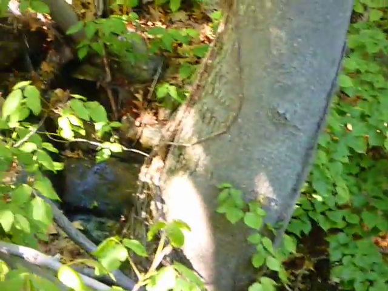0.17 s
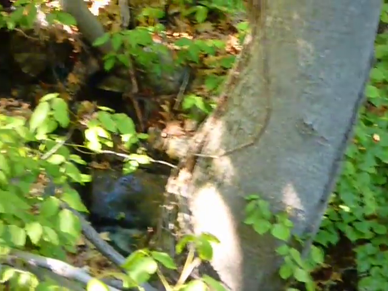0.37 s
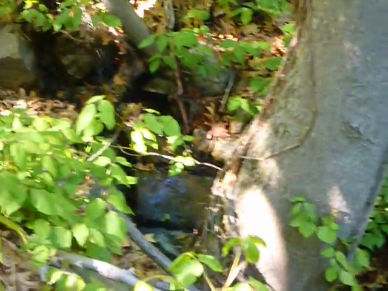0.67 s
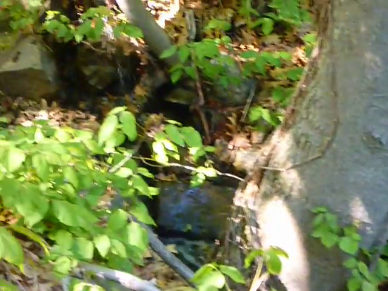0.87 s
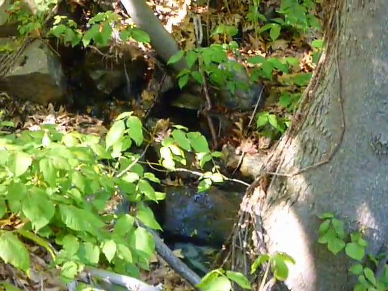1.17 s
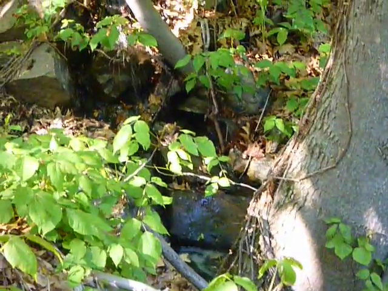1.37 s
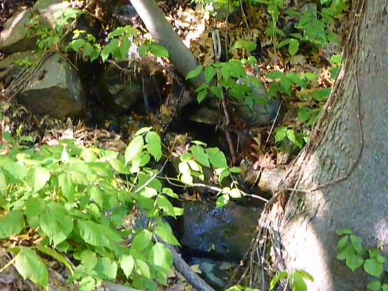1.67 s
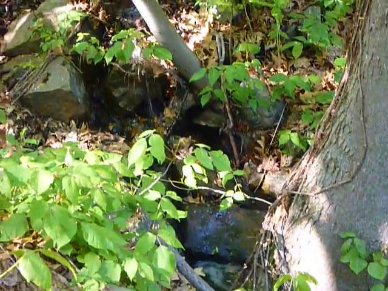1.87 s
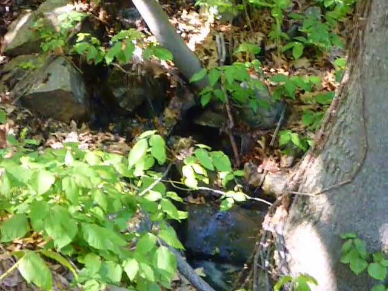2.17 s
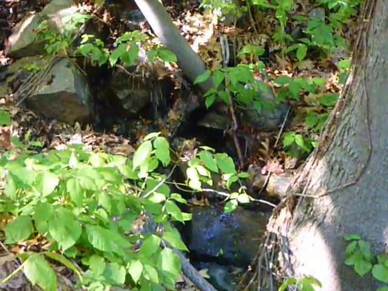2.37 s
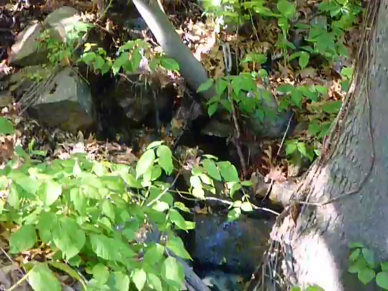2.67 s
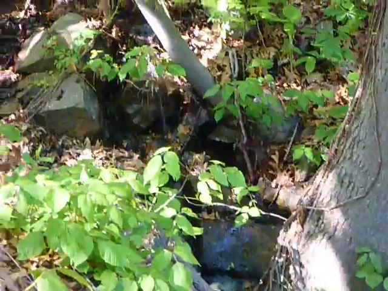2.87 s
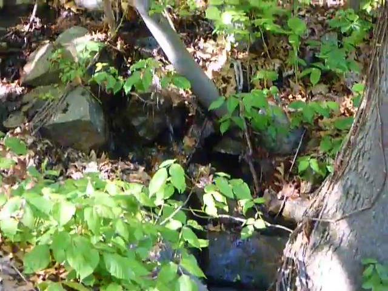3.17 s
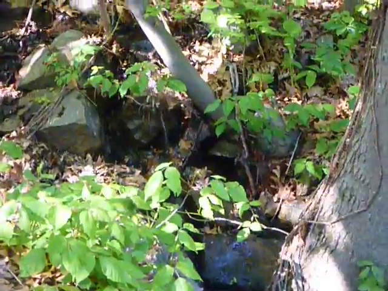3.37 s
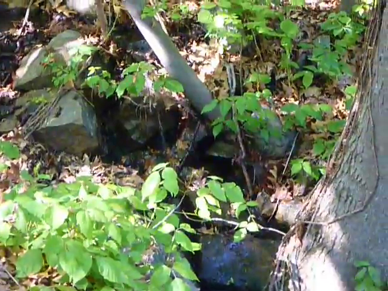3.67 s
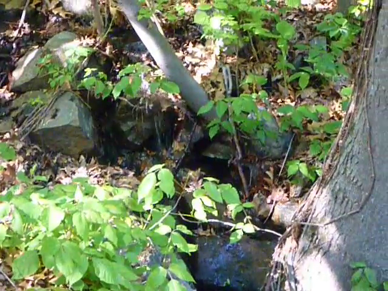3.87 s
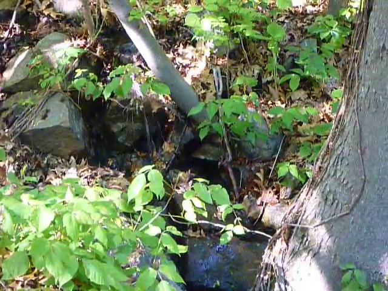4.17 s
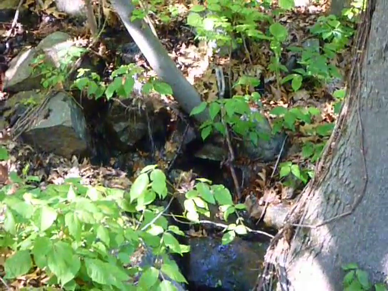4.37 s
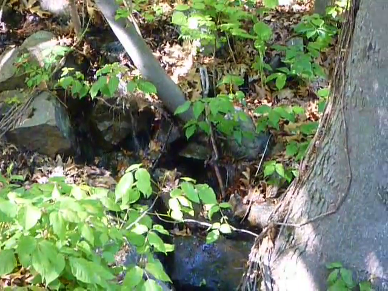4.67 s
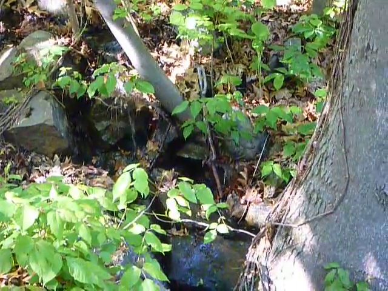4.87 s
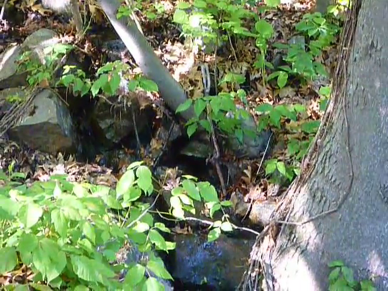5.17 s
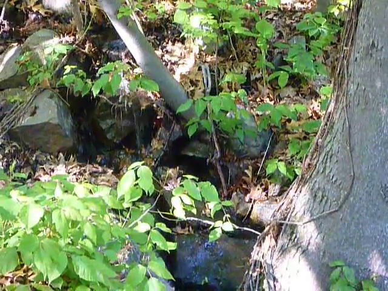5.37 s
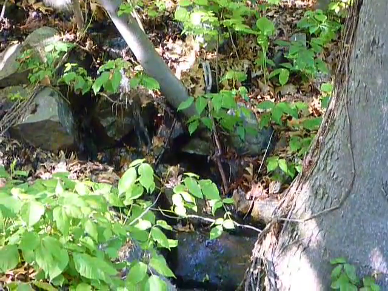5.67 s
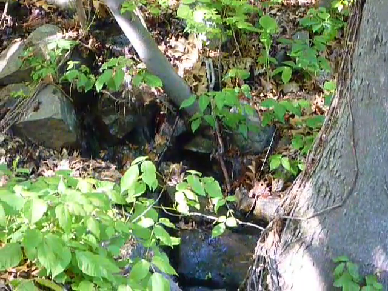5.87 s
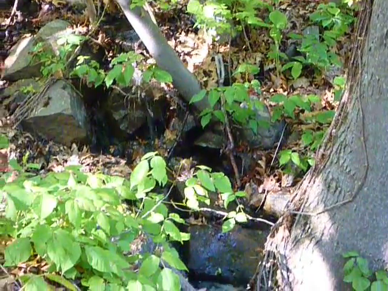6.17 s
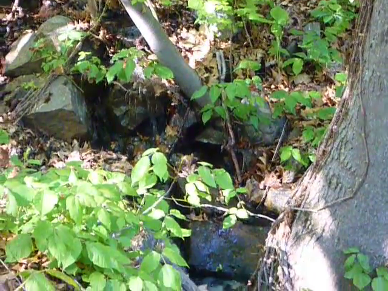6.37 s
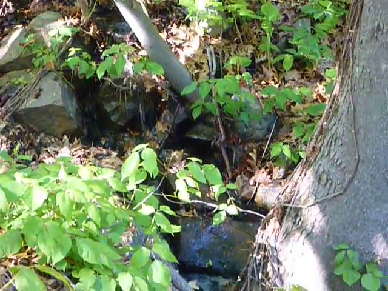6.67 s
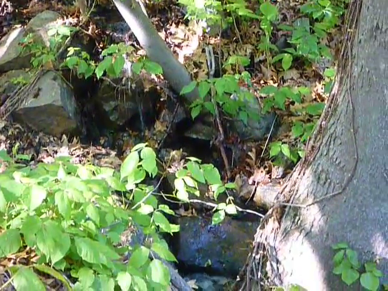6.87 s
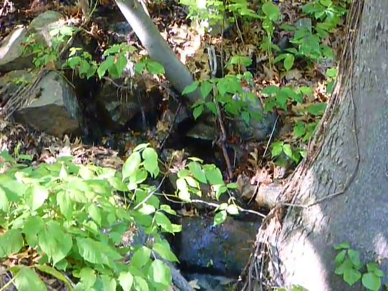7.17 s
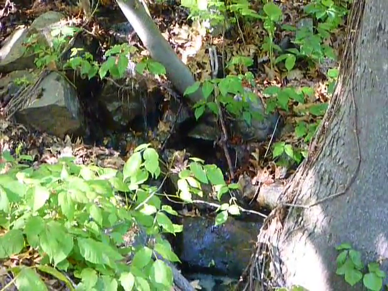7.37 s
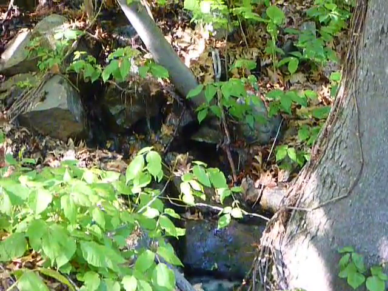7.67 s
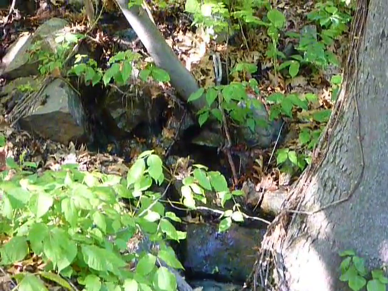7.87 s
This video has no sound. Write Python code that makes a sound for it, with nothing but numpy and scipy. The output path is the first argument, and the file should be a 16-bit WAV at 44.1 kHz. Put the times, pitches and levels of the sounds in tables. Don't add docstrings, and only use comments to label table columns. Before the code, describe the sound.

Constant babbling stream water, nearly level throughout, dipping very slightly near six seconds and a touch stronger at the end. Watery plops and bloops ring over the rush, clustered around one to three seconds and again in the last two, with quick slaps against rock and thin spray ticks. Short, close outdoor reflections, soft low rumble, mono sound with muffled top end.

```python
import sys
import numpy as np
from scipy import signal
from scipy.fft import rfft, irfft, next_fast_len
from scipy.io import wavfile
from scipy.ndimage import uniform_filter1d, map_coordinates

SR = 44100
rng = np.random.default_rng(int(sys.argv[2]) if len(sys.argv) > 2 else 0)


def how_loud(loudness_db):
    steps = np.asarray(loudness_db, float) / 20
    return 10 ** steps


def generate_wav(sig):
    pcm = np.round(np.clip(np.atleast_2d(sig).T, -1, 1) * 32767).astype(np.int16)
    wavfile.write(sys.argv[1], SR, pcm)


N = 354167


def unit(x):
    return x / np.sqrt(np.mean(x ** 2) + 1e-20)


def along(points, hz):
    f, v = np.transpose(points)
    return np.interp(np.log(hz + 1), np.log(f + 1), v)


def wobble(knots_per_s):
    knots = rng.standard_normal(int(N * knots_per_s / SR) + 4)
    return map_coordinates(knots, [np.arange(N) * knots_per_s / SR])


def filtered(x, gain):
    m = next_fast_len(N + 8192)
    return irfft(rfft(x, m) * gain(np.fft.rfftfreq(m, 1 / SR)), m)[:N]


def patchy(patchy_db):
    z = signal.stft(rng.standard_normal(N + 512), nperseg=256)[2]
    field = uniform_filter1d(rng.standard_normal(z.shape), 5, 0)
    field = uniform_filter1d(field, 12, 1)
    noise = signal.istft(z * how_loud(patchy_db * unit(field)), nperseg=256)[1]
    return unit(noise[:N])


def ring(start_s, hz, peak, cycles, rise, size):
    t = np.arange(size) / SR
    length_s = (np.clip(cycles, .3, 40) / hz)[:, None]
    u = t / (0.36 * length_s)
    fade = np.cos(np.pi / 2 * t / t[-1])
    shape = (u * np.exp(1 - u)) ** 0.96 * fade
    turns = hz[:, None] * t * (1 + rise[:, None] * (t / length_s - 1) / 2)
    wave = peak[:, None] * shape * np.sin(2 * np.pi * turns)
    at = np.round(start_s * SR).astype(int)[:, None] + np.arange(size)
    return np.bincount(at.ravel(), wave.ravel(), N + size + SR)[:N]


def swarm(count, low_hz, high_hz, cycles, spread_db, clump_db, clump_rate, size):
    when, pitch, strength, length, climb = rng.random((count, 5)).T
    hz = low_hz + (high_hz - low_hz) * pitch
    clump = np.clip(wobble(clump_rate)[(when * (N - 1)).astype(int)], -2, 1.5)
    peak_db = -spread_db * np.log(1 - .97 * strength) + clump_db * clump
    peak = how_loud(peak_db) * np.sqrt(hz)
    return unit(ring(when * N / SR, hz, peak, cycles * (.5 + length), 0.11 * climb, size))


# [t/s, level/dB]
FLOW_OVER_LIP = [
    (0.0, -46),
    (0.6, -45.5),
    (1.88, -45.5),
    (2.17, -45.5),
    (6.11, -46),
    (6.66, -45.5),
    (7.36, -46),
    (8.03, -45),
]


def flow():
    s, db = np.transpose(FLOW_OVER_LIP)
    level_db = np.interp(np.arange(N) / SR, s, db)
    return level_db - level_db.mean()


# [f/Hz, level/dB per Hz]
WATER_COLOUR = [(120, -27), (250, -5.5), (490, -4.5), (650, -1), (1400, -6.5), (1800, -8), (2800, -9.5),
                (4500, -11.5), (6000, -13.5), (9500, -18)]
# [f/Hz, width/Hz, lift/dB]
ROCK_POCKETS = [(427, 45, 4.5), (553, 27, 2), (660, 51, 1.5), (860, 67, 2), (1100, 240, 1.5),
                (1595, 99, 2.5), (1800, 130, -1), (2200, 170, 2), (2810, 67, 2.5)]


def hollow(hz):
    lift_db = sum(db / (1 + (2 * (hz - c) / w) ** 2) for c, w, db in ROCK_POCKETS)
    return how_loud(along(WATER_COLOUR, hz) + lift_db)


def falling_water():
    rush = patchy(0.68) * how_loud(.3 * wobble(11))
    gurgle = swarm(count=3000, low_hz=247.4, high_hz=2000, cycles=7.3,
                   spread_db=0.8, clump_db=-1.0, clump_rate=14, size=800)
    trickle = swarm(count=700, low_hz=2547, high_hz=2995, cycles=29,
                    spread_db=0.5, clump_db=-1.5, clump_rate=5, size=400)
    fizz = swarm(count=7500, low_hz=1800, high_hz=8620, cycles=6.6,
                 spread_db=1.5, clump_db=2.8, clump_rate=16, size=200)
    ticks = swarm(count=6000, low_hz=1500, high_hz=7800, cycles=1.44,
                  spread_db=0.5, clump_db=-0.5, clump_rate=16, size=48)
    plops = swarm(count=1100, low_hz=452, high_hz=1600, cycles=6.1,
                  spread_db=-0.1, clump_db=2.1, clump_rate=8, size=1200)
    bubbling = how_loud(-22) * plops + how_loud(-15.0) * gurgle + how_loud(-22.0) * trickle
    spray = how_loud(-10.5) * fizz + how_loud(-13.0) * ticks
    return rush + bubbling + spray


GURGLE_DB, GURGLE_DB_PER_FLOW_DB = -47.5, 1.3
SPRAY_DB, SPRAY_DB_PER_FLOW_DB = -48, 0.72
SURGE_DB, SURGES_PER_S = .25, 9


def cascade():
    def low_share(hz):
        return 1 / (1 + (hz / 1700) ** 4)

    water = falling_water()
    low = unit(filtered(water, lambda hz: hollow(hz) * low_share(hz)))
    high = unit(filtered(water, lambda hz: hollow(hz) * (1 - low_share(hz))))
    gurgle_db = GURGLE_DB + GURGLE_DB_PER_FLOW_DB * flow() + .15 * wobble(7.2)
    spray_db = SPRAY_DB + SPRAY_DB_PER_FLOW_DB * flow() + .15 * wobble(9.2)
    surge = how_loud(SURGE_DB * wobble(SURGES_PER_S) + splashes())
    return surge * (low * how_loud(gurgle_db) + high * how_loud(spray_db))


# [f/Hz, level/dB per Hz]
VALLEY_AIR = [(15, -32), (30, -26), (45, -21), (60, -6.5), (85, -4), (120, -1.5), (200, 1), (300, -2.5),
              (500, -14), (900, -45.5)]
RUMBLE_DB, RUMBLE_DB_PER_FLOW_DB = -53, .3


def rumble():
    def colour(hz):
        hum_db = 5 / (1 + ((hz - 96) / 6) ** 2)
        return how_loud(along(VALLEY_AIR, hz) + hum_db)

    air = filtered(patchy(-0.2), colour)
    level_db = RUMBLE_DB + RUMBLE_DB_PER_FLOW_DB * flow() + .6 * wobble(5)
    return how_loud(level_db) * unit(air)


# [t/s, level/dB]
SLUGS = [(0.0818, -36), (0.8196, -38), (1.0511, -41.5), (1.5185, -24.5), (1.8822, -33.5), (2.0418, -37.5),
         (2.1136, -30), (2.3146, -33), (2.5931, -40.5), (3.0316, -34.5), (3.1782, -34), (3.2546, -35.5),
         (3.48, -40.5), (3.8542, -35.5), (4.3523, -32), (5.2595, -37), (5.7808, -42), (6.0138, -40.5),
         (6.085, -38), (6.3211, -34.5), (6.7057, -39), (6.8823, -37), (6.9584, -35.5), (7.0215, -40.5),
         (7.2106, -29), (7.3416, -35.5), (7.5895, -35.5), (7.897, -38)]
SPLASH_ATTACK_S, SPLASH_DECAY_S = 0.0025, 0.02
SPLASH_FLOOR_DB, SPLASH_SHARE = -46, .17


def splashes():
    s, db = np.transpose(SLUGS)
    height_db = np.clip(db - SPLASH_FLOOR_DB, 0, None)
    slugs = np.bincount(np.round(s * SR).astype(int), height_db, N)
    t = np.arange(SR // 4) / SR
    shape = (1 - np.exp(-t / SPLASH_ATTACK_S)) * np.exp(-t / SPLASH_DECAY_S)
    return SPLASH_SHARE * signal.fftconvolve(slugs, shape)[:N]


LONGER_PER_OCTAVE, SHORTER_PER_DB = 0.39, .055


def ringing(cycles, hz, db):
    return cycles * np.exp(LONGER_PER_OCTAVE * np.log2(hz / 1000) - SHORTER_PER_DB * (db + 40))


# [t/s, level/dB]
SIDE_TRICKLE = [(0.09, -42), (.672, -38.5), (.72, -46), (.884, -42), (1.181, -40), (1.424, -41.5),
                (1.539, -42), (1.887, -40.5), (2.114, -36), (2.593, -38), (3.178, -45), (3.26, -42),
                (3.715, -45), (6.958, -43.5), (7.761, -42), (7.896, -48)]
# [t/s, f/Hz, level/dB]
LARGER_BUBBLES = [(.179, 1010, -39), (.386, 660, -37), (.6, 550, -39), (.647, 554, -43), (.902, 1020, -39),
                  (.953, 1060, -35), (1.039, 557, -38), (1.129, 576, -37), (1.442, 630, -28.5),
                  (1.554, 1070, -38), (2.17, 320, -34), (2.262, 934, -42), (4.125, 920, -42),
                  (2.522, 1170, -33.5), (2.831, 1250, -37.5), (2.852, 850, -33), (3.379, 830, -35),
                  (4.636, 1030, -35), (4.754, 1230, -37), (4.958, 915, -35.5), (5.373, 824, -36),
                  (6.088, 575, -37), (6.153, 870, -35), (6.76, 720, -36), (6.807, 610, -36.5),
                  (6.904, 680, -33), (7.177, 1270, -38), (7.712, 656, -33), (7.774, 630, -31.5),
                  (7.944, 860, -36),
                  (.082, 1470, -40), (.089, 1870, -42), (.82, 1900, -38), (.953, 1600, -37),
                (1.157, 2000, -44), (1.197, 2230, -43), (.905, 1540, -40), (1.145, 1550, -40),
                (2.13, 1550, -32), (2.52, 1890, -40), (3.031, 1550, -36), (3.225, 1630, -41),
                (4.082, 1440, -40.5), (4.399, 3200, -44.5), (5.26, 1600, -40.5), (5.428, 1330, -43),
                (6.014, 2310, -45), (6.085, 1770, -42), (6.452, 1210, -37), (6.958, 2220, -39.5),
                (7.285, 1570, -43), (7.342, 2170, -36), (7.548, 1300, -44.5), (7.59, 2360, -45),
                (7.76, 1290, -39), (7.813, 1100, -39)]
TRICKLE_HZ, TRICKLE_SCATTER = 2790, .012
RISE, RISE_SCATTER = 0.021, 0.027


def pool_bubbles():
    trickle = [(s, TRICKLE_HZ * (1 + TRICKLE_SCATTER * rng.normal()), db) for s, db in SIDE_TRICKLE]
    s, hz, db = np.transpose(LARGER_BUBBLES + trickle)
    cycles = ringing(8.9, hz, db)
    rise = RISE + RISE_SCATTER * rng.standard_normal(len(s))
    return ring(s - 0.098 * cycles / hz, hz, how_loud(db - 3.5), cycles, rise, size=2000)


def brief(s, hz, db, cycles):
    return ring(s - .1 * cycles / hz, hz, how_loud(db - 1.5), cycles, 0.024 + 0 * hz, size=1200)


# [t/s, f/Hz, level/dB, length/cycles]
STONE_SLAPS = [(0.486, 1500, -35.5, 1), (.612, 613, -38, 8.6), (.657, 620, -40, 9.3),
               (1.452, 700, -42.5, 6.1), (1.5711, 1800, -40, 1), (2.317, 2200, -30.5, 1.9),
               (2.353, 558, -35.5, 11), (2.385, 620, -41, 12), (2.405, 688, -44.5, 15),
               (2.435, 670, -45, 12), (2.5903, 1800, -41, 1.2), (4.353, 2000, -40, 0.97),
               (6.0772, 960, -30, 1.3), (7.295, 1800, -35.5, 1.1), (7.357, 1800, -38, 1),
               (7.7115, 1100, -30.5, 1.3)]


def slaps():
    return brief(*np.transpose(STONE_SLAPS))


# [t/s, f/Hz, level/dB]
SPRAY_DROPS = [(.696, 5650, -44), (.911, 7100, -43), (1.314, 4830, -42), (1.886, 4870, -52.5),
               (2.043, 4640, -40), (2.15, 4140, -35.5), (2.829, 4750, -42), (2.887, 3770, -42.5),
               (3.054, 3870, -40), (3.256, 3580, -42), (3.29, 4800, -43.5), (4.354, 4800, -43),
               (4.391, 4360, -42), (4.449, 3570, -43), (4.539, 4770, -40), (4.831, 4800, -42),
               (5.055, 3670, -43), (5.356, 6640, -39.5), (5.852, 6700, -45.5), (6.146, 4870, -43.5),
               (6.41, 5700, -41.5), (6.565, 6200, -45.5), (6.746, 4600, -46.5), (6.955, 4170, -45.5),
               (7.022, 3900, -39.5), (7.908, 4470, -42.5)]


def drops():
    s, hz, db = np.transpose(SPRAY_DROPS)
    return brief(s, hz, db, ringing(5.7, hz, db))


# [f/Hz, t60/s]
BANK_T60 = [(200, 0.17), (2000, 0.069), (8000, 0.03)]


def bank_answer(near):
    f, t, z = signal.stft(rng.standard_normal(SR // 6), SR, nperseg=256)
    decay = how_loud(-60 * t / along(BANK_T60, f)[:, None])
    tail = signal.istft(z * decay, SR, nperseg=256)[1]
    delayed = np.pad(near, (150, 0))
    return how_loud(-5.5) * signal.fftconvolve(delayed, tail / np.linalg.norm(tail))[:N]


def shaded(bed, near, depth):
    z = signal.stft(bed, nperseg=512, noverlap=384)[2]
    cover = np.abs(signal.stft(near, nperseg=512, noverlap=384)[2]) ** 2
    usual = np.mean(np.abs(z) ** 2, axis=1, keepdims=True) + 1e-20
    return signal.istft(z / np.sqrt(1 + depth * cover / usual), nperseg=512, noverlap=384)[1][:N]


def scene():
    near = pool_bubbles() + slaps() + drops()
    near = near + bank_answer(near)
    bed = cascade() + rumble()
    return (shaded(bed, near, depth=1.6) + near)[None]


# [f/Hz, level/dB]
CONVERTER_ROLLOFF = [(6000, -0.5), (7000, -2.5), (7500, -5.5), (8000, -10), (8400, -18), (8700, -26.5),
                     (8950, -38.5), (9150, -53.5)]
CAPTURE_HZ, OFFSET = 16000, -.0514


def converter(x):
    kept = filtered(x, lambda hz: hz < CAPTURE_HZ / 2)
    mirrored = kept * (1 + 2 * np.cos(2 * np.pi * CAPTURE_HZ * np.arange(N) / SR))
    heard = filtered(mirrored, lambda hz: how_loud(along(CONVERTER_ROLLOFF, hz)) * (hz < 9400))
    return heard[None] + OFFSET


def top_cut(x):
    return signal.sosfilt(signal.butter(12, 9070, fs=SR, output="sos"), x)


def record(dry):
    mix = converter(dry[0])
    return top_cut(mix)


dry = scene()
out = record(dry)
generate_wav(out)
```